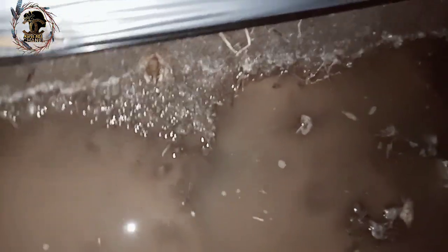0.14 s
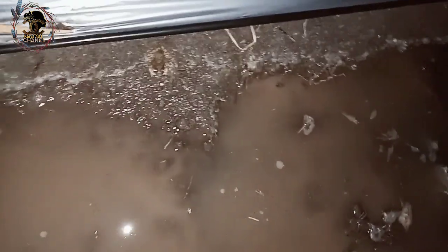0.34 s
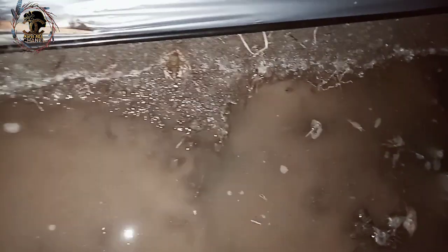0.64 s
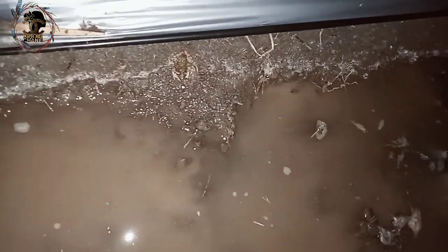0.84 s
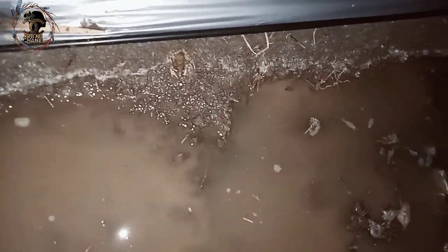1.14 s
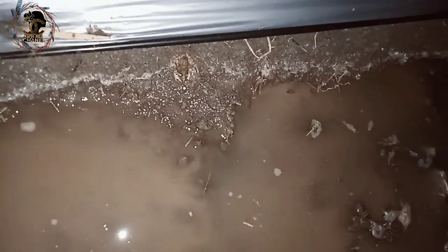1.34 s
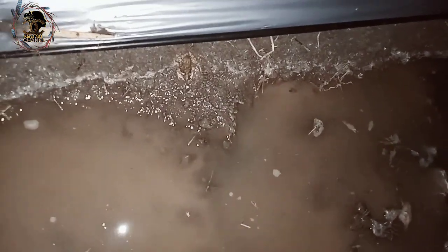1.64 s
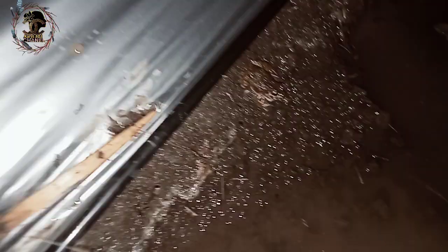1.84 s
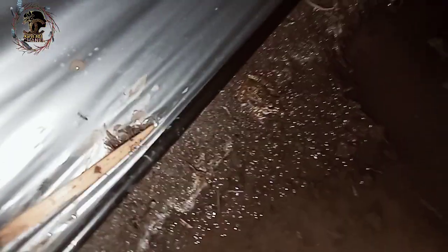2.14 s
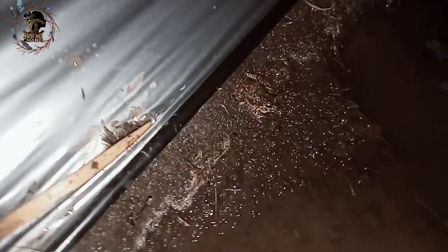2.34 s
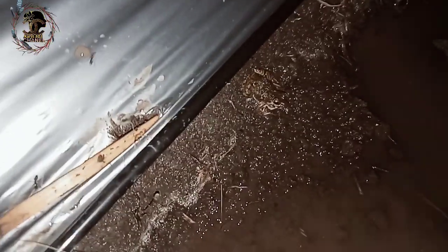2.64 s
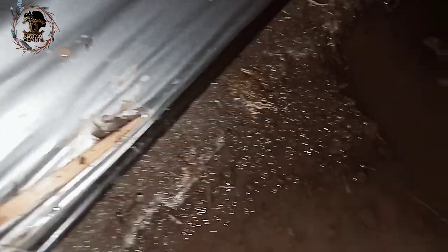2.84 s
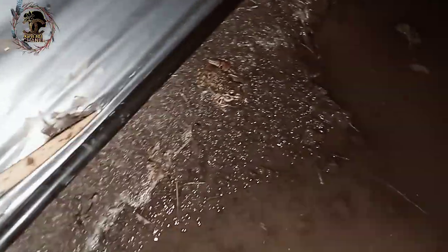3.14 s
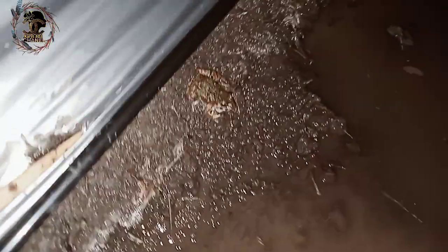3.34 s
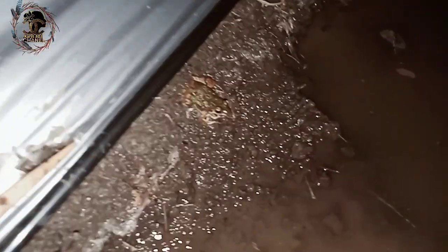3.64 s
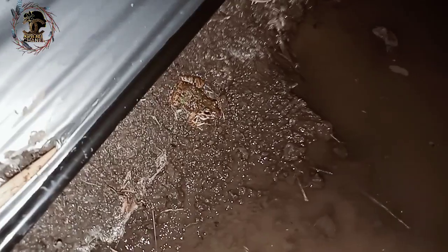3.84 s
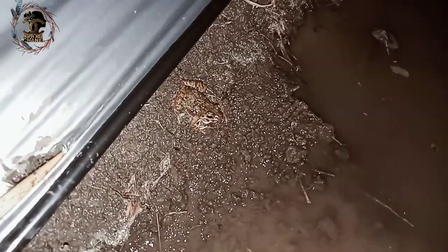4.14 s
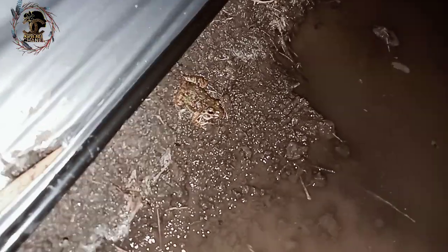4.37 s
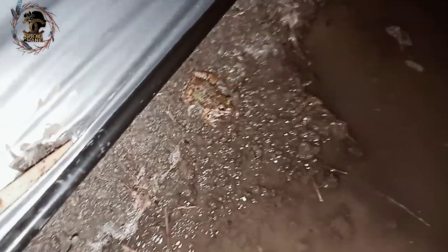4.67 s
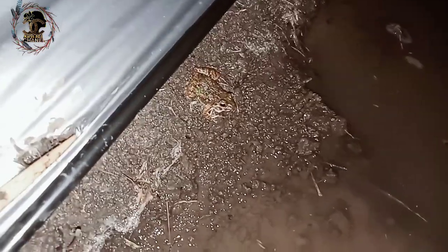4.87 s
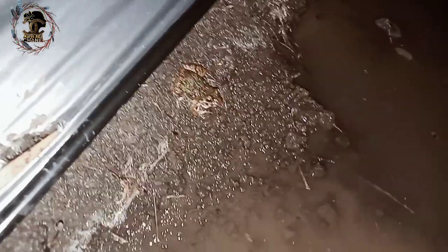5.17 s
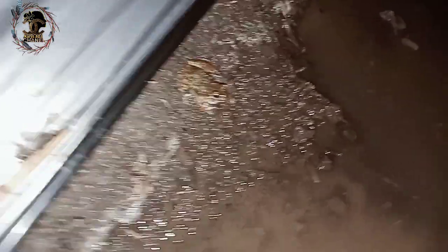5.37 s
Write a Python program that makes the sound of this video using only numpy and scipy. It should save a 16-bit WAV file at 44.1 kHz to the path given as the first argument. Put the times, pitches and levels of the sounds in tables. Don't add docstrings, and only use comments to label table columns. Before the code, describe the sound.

Small frogs give short, rattling, bright croaks at a pond's edge, one close and others farther, over babbling, dripping water.

```python
import sys
import numpy as np
from scipy import signal
from scipy.fft import rfft, irfft, next_fast_len
from scipy.io import wavfile
from scipy.ndimage import map_coordinates

SR = 44100
rng = np.random.default_rng(int(sys.argv[2]) if len(sys.argv) > 2 else 0)


def output_pcm(signal):
    pcm = np.clip(np.atleast_2d(signal).T, -1, 1) * 32767
    wavfile.write(sys.argv[1], SR, np.round(pcm).astype(np.int16))


def how_loud(loudness_db):
    steps = np.asarray(loudness_db, float) / 20
    return 10 ** steps


N = 242991

# f/Hz, level/dB
SAC_BAND = [(1900, -42), (2200, -8), (2330, -16), (2470, -15), (2610, -3), (2745, -7), (2885, 2.5),
            (3020, 2.5), (3155, -12), (3290, 0.5), (3430, -23), (3560, -17.5), (3750, -25.5), (4300, -73)]
# f/Hz, level/dB
THROAT_BAND = [(700, -31.5), (960, -31.5), (1090, -8.5), (1235, 3.5), (1370, -2.5), (1510, -4), (1640, -16),
               (1800, -15.5), (2050, -20), (2300, -51)]
# f/Hz, level/dB
SNAP_BAND = [(3200, -40.5), (3800, -1.5), (4600, -2), (6200, -9), (8300, 2), (10000, -17.5), (15800, -18)]
# f/Hz, delay/s
THROAT_DELAY = [(1000, -.0045), (1165, -.0036), (1300, -.0018), (1440, -.0013), (1600, .0006), (2000, .002)]
SAC_DELAY = [(2130, -.0022), (2260, .001), (2400, .0012), (2540, -.0018), (2680, -.0018), (2815, -.001),
             (2950, .0008), (3090, -.0009), (3220, .0004), (3300, .0024), (3500, .0024)]

# t of first pulse/s, length/cycles, pulse rate/Hz, level/dB
NEAR_LONG_NOTES = [
    (-0.0154, 5.58, 138.6, -17.5),
    (0.4442, 5.67, 139.5, -16),
    (0.8392, 4.79, 138.1, -16.5),
    (1.3474, 5.715, 140.6, -17),
    (1.8052, 6.45, 139.4, -17),
    (2.3501, 6.13, 135.8, -20),
    (3.0581, 6.15, 140.8, -19.5),
    (3.5835, 4.674, 140.2, -18.5),
]
FAR_LONG_NOTES = [(0.1041, 5.59, 134.7, -29), (0.4991, 4.53, 134.4, -28), (1.0142, 4.58, 133.5, -30.5),
                  (1.4724, 5.47, 139.1, -28.5), (2.0102, 5.89, 135.4, -28.5), (2.6777, 4.78, 132.3, -34),
                  (2.7182, 6.33, 139, -32.5), (3.1358, 6.27, 134.2, -32.5), (3.2438, 5.11, 134.7, -30.5),
                  (3.7299, 3.99, 141.8, -28), (4.0753, 4.95, 134.5, -32), (4.5833, 5.3, 135.6, -32.5),
                  (4.8833, 3.87, 135.9, -35), (5.0485, 4.65, 133.3, -31)]
AWAY_LONG_NOTES = [
    (0.6282, 3.86, 139.6, -34.5),
    (0.9611, 6, 137.9, -24),
    (2.2084, 4.24, 139.4, -44.5),
    (3.3905, 2.9, 135.7, -39.5),
    (3.6949, 4.9, 140.6, -31),
    (4.2045, 4.37, 144.6, -40.5),
]
SHORT_CALLS = [(0.2054, 2.9, 122.7, -29), (0.5451, 2.89, 123.3, -18), (0.6083, 1.86, 117.3, -24),
               (0.9492, 1.7, 127.4, -11), (1.1117, 3.03, 125.2, -27.5), (1.4514, 3.12, 117.3, -16),
               (1.5841, 2.88, 132.2, -28), (1.9238, 2.79, 125, -16.5), (2.1597, 1.95, 113.3, -36.5),
               (2.2921, 4.35, 124.4, -33), (2.8452, 2.97, 134.3, -26.5), (3.188, 3, 127.8, -19),
               (4.1842, 2.19, 116.6, -28.5), (5.0104, 2.36, 120.9, -34.5), (5.1601, 2.96, 125, -32)]
AWAY_SHORT_CALLS = [
    (3.3365, 1.46, 93.6, -28),
    (3.3685, 1.99, 132.5, -33.5),
    (3.6763, 1.594, 88.34, -16),
    (3.7155, 0.75, 143, -13.5),
    (3.7813, 2.63, 133.1, -30.5),
    (4.6875, 3.08, 125.1, -30),
]
DEEP_NOTES = [
    (5.2221, 3.63, 125.4, -21.5),
    (5.3503, 1.74, 128.8, -22),
]
WARM_UP_PULSES = [
    (0.832, 0.85, 138, -27),
    (0.9414, 0.82, 128, -25.5),
    (3.5763, 0.345, 138, -26),
    (3.6655, 0.28, 110, -29.5),
    (4.0679, 0.68, 136, -42),
    (5.2141, 0.46, 125, -41),
    (5.3426, 0.7, 129, -40),
]
QUICK_NOTES = [
    (2.1054, 2.6, 149.2, -32.5),
    (2.445, 2.8, 146.5, -22),
    (2.5014, 3.3, 145.4, -27),
]

# t/s, level/dB
FLOW_LEVEL = [(0, -40.5), (0.29, -41.5), (0.69, -40.5), (1.05, -40), (1.3, -40.5), (1.53, -40),
              (1.69, -40.5), (1.96, -40), (2.1, -42), (2.6, -42.5), (3.15, -42), (3.73, -42), (3.96, -43),
              (4.42, -43.5), (4.68, -41.5), (4.9, -41.5), (5.09, -41.5), (5.51, -40)]
# f/Hz, density/(dB per Hz)
BABBLE_BAND = [(120, -50), (200, -25), (360, -14.5), (500, -2.5), (720, -4), (1010, -1.5), (1300, 0),
               (2300, -3.5), (2700, -11.5), (3300, -22), (4500, -45), (5850, -41), (9900, -120)]
FIZZ_BAND = [(2000, -17), (3000, -2), (3900, -7), (5500, -15.5), (7000, -13.5), (9500, -13), (12500, -28.5),
             (15800, -31.5), (16500, -60)]
# t/s, level/dB
FAR_CHORUS_LEVEL = [
    (0, -46),
    (0.2, -68),
    (0.7, -64),
    (1.3, -48.5),
    (2.0, -46.5),
    (2.2, -51),
    (4.1, -58.5),
    (4.45, -45),
    (5.51, -41),
]
# f/Hz, width/Hz, level/dB
PORT_PEAKS = [(3890, 650, 4.5), (4861, 116, 7.5), (8286, 1174, 13.5), (10800, 142, 3), (11430, 470, 11),
              (13500, 720, 13), (15600, 300, 9)]
# f/Hz, density/(dB per Hz)
RUMBLE_BAND = [(15, -54), (25, -27.5), (53, -16.5), (80, -8), (113, 3.5), (145, -4.5), (300, -18),
               (390, -21.5), (660, -120)]
# f/Hz, level/dB
HUM_TONES = [(51, -72.5), (101, -93), (122, -84.5)]

# t/s, level/dB, f/Hz
LOW_PLOPS = [(0.062, -28.5, 1630), (0.205, -31.5, 590), (0.69, -28, 1082), (0.743, -23.5, 1360),
             (0.795, -29, 2400), (0.885, -25, 1690), (1.001, -22.5, 1335), (1.087, -29.5, 923),
             (1.097, -34, 734), (1.138, -25.5, 536.4), (1.438, -31.5, 1360), (1.546, -28.5, 907),
             (1.555, -31.5, 2270), (1.625, -25, 1200), (1.792, -31, 2140), (1.882, -30.5, 1227),
             (1.911, -37.5, 1360), (2.076, -26, 1063), (2.434, -39.5, 352.5), (2.488, -27.5, 3110),
             (2.249, -42.5, 594), (3.999, -30, 855), (4.119, -31.5, 856), (4.278, -40.5, 339),
             (4.476, -28.5, 2000), (4.653, -25, 1555), (4.754, -25.5, 1894), (4.981, -25.5, 2040),
             (5.145, -29, 2010), (5.305, -28.5, 2020)]
HIGH_TICKS = [(0.074, -40.5, 4070), (0.332, -42, 4200), (0.531, -44, 7900), (0.583, -41, 10100),
              (0.615, -42.5, 7530), (0.744, -35, 8070), (1.137, -35.5, 8130), (1.214, -40.5, 7020),
              (1.611, -34.5, 7920), (1.678, -40, 9850), (1.692, -37, 8670), (1.709, -34.5, 7950),
              (2.622, -44, 11100), (2.703, -36.5, 8150), (2.746, -40.5, 7960), (3.159, -44.5, 11200),
              (3.453, -33.5, 8270), (3.734, -38.5, 7650), (4.058, -38, 8070), (4.333, -36.5, 8590),
              (4.361, -42.5, 3820), (2.473, -47.5, 3180), (4.557, -41, 4120), (4.963, -34.5, 8410),
              (5.179, -44.5, 9060), (5.415, -36, 3270)]
# t/s, length/s, level/dB, f/Hz
MUD_BURBLES = [
    (0.81, 0.093, -38.5, 524),
    (0.99, 0.028, -38, 561),
    (1.085, 0.0723, -37, 613),
    (4.72, 0.11, -42.5, 489),
    (5.03, 0.0767, -38.5, 478),
]
# t/s, level/dB
PEAK_CEILING = [
    (0, -11.5),
    (1.98, -11.5),
    (2.0, -14.3),
    (5.51, -14.3),
]

FADE_DB_PER_CYCLE = -14
THROAT_LAG = 0.007
SAC_MIDDLE_HZ, SAC_TILT_HZ, SWELL_S = 2950, 350, .009
SNAP_DB = -26
FIZZ_DB = -11.5
RUMBLE_DB, RUMBLE_GROWS = -66.5, 1.74
STRAY_DB, STRAY_SPREAD_DB, STRAY_LO_HZ, STRAY_HI_HZ = -48, 4, 340, 12000
BURBLE_SPREAD = 0.206


def unit(x):
    return x / np.sqrt(np.mean(x ** 2) + 1e-20)


def curves(rows):
    s, *cols = np.transpose(rows)
    return [np.interp(np.arange(N) / SR, s, c) for c in cols]


def wobble(rate):
    knots = rng.standard_normal(int(N * rate / SR) + 4)
    return map_coordinates(knots, [np.arange(N) * rate / SR])


def along(points, hz):
    f, v = np.transpose(points)
    return np.interp(np.log(hz + 1), np.log(f + 1), v)


def filtered(x, response):
    m = next_fast_len(N + 8192)
    return irfft(rfft(x, m) * response(np.fft.rfftfreq(m, 1 / SR)), m)[..., :N]


def coloured(x, spectrum, peaks=()):
    def response(hz):
        bumps = sum(top / (1 + (2 * (hz - c) / w) ** 2) for c, w, top in peaks)
        return how_loud(along(spectrum, hz) + bumps)
    return unit(filtered(x, response))


def voices(notes, throat_db, onset_db):
    return [(*note, throat_db, onset_db) for note in notes]


def rasp(pulses, db, t60):
    tail = how_loud(-60 * np.arange(400) / SR / t60)
    flutter = signal.fftconvolve(pulses, tail / np.linalg.norm(tail))[:N]
    return pulses + how_loud(db) * flutter * rng.standard_normal(N)


def voiced(pulses, spectrum, sweep, shift, spread):
    def response(hz):
        gain = how_loud(along(spectrum, hz / shift))
        turns = spread * np.cumsum(along(sweep, hz / shift)) * hz[1]
        return gain / np.sqrt(np.mean(gain ** 2)) * np.exp(-2j * np.pi * turns)
    return filtered(pulses, response)


def croak(notes, wake_db, wake, sag_db, gain_db, shift, rasp_db, glide):
    ring, throat, burst, fill = np.zeros((4, N))
    for s, cycles, hz, ring_db, throat_db, onset_db in notes:
        count = int(np.ceil(cycles))
        k = np.arange(count + 1)
        t = k / hz
        chance = rng.standard_normal((count + 1, 3))
        fade = FADE_DB_PER_CYCLE * (count - cycles) * (k >= count - 1)
        edge = gain_db + onset_db * (k == 0) + fade
        unrest = .00002 + .00025 * np.exp(-t / .007)
        at = np.round((s + t + unrest * chance[:, 2]) * SR).astype(int)
        size = np.sqrt(SR / hz) * (at >= 0)
        waking = wake_db * np.exp(-(t / wake) ** 2)
        ring[at] += (k < count) * size * how_loud(ring_db + edge + waking + chance[:, 0])
        fill[at] = glide * (.4 - 1.4 * np.exp(-t / SWELL_S))
        low_db = ring_db + throat_db - 2.5 + edge - 7.7 * (k == count) + sag_db * t
        low = size * how_loud(low_db + chance[:, 1])
        throat[at[1:] + np.round(THROAT_LAG * t[1:] * SR).astype(int)] += low[1:]
        burst[at[0]] += low[0]

    def sac_ring(way):
        pulses = rasp(ring * (1 + way * fill) / 2, rasp_db, t60=.03)
        return voiced(pulses, SAC_BAND, SAC_DELAY, 1, 1)
    slack, taut = sac_ring(-1), sac_ring(1)
    tilted = filtered(taut - slack, lambda hz: np.clip((hz - SAC_MIDDLE_HZ) / SAC_TILT_HZ, -1, 1))
    snap = how_loud(SNAP_DB) * voiced(rasp(ring, 1.89, t60=0.0302), SNAP_BAND, SAC_DELAY, 1, 0)
    start = voiced(burst, THROAT_BAND, THROAT_DELAY, 1.0906 * shift, 0.3413)
    tone = voiced(rasp(throat, rasp_db, t60=0.16), THROAT_BAND, THROAT_DELAY, shift, 0.93)
    return slack + taut + tilted + snap + start + tone


def frogs():
    long = (voices(NEAR_LONG_NOTES, 4.945, -4.5) + voices(FAR_LONG_NOTES, 4.3, -6.0)
            + voices(AWAY_LONG_NOTES, 1.5, 1.18) + voices(WARM_UP_PULSES, 3.6, .1)
            + voices(QUICK_NOTES, -0.6, -2.45))
    short = voices(SHORT_CALLS, -0.77, -1.5) + voices(AWAY_SHORT_CALLS, -3.5, -4.47)
    deep = voices(DEEP_NOTES, 6.28, -1.23)
    return (croak(long, wake_db=-0.5, wake=0.0071, sag_db=-150, gain_db=-2.0,
                  shift=0.9725, rasp_db=-10, glide=0.368)
            + croak(short, wake_db=-0.5, wake=0.0046, sag_db=-150, gain_db=-4.0,
                    shift=1.08, rasp_db=-4.5, glide=0.405)
            + croak(deep, wake_db=1.5, wake=0.0036, sag_db=-120, gain_db=-2.5,
                    shift=0.9377, rasp_db=-3, glide=-0.028))


def place(s, shapes):
    at = np.round(s * SR).astype(int)[:, None] + np.arange(shapes.shape[1])
    inside = (at >= 0) & (at < N)
    return np.bincount(at[inside], shapes[inside], N)


def bubbles(s, hz, gain, cycles, rise, size):
    turn = hz[:, None] * np.arange(size) / SR
    life = turn / cycles[:, None]
    swell = np.exp(-life) * (1 - np.exp(-3 * turn))
    tone = np.sin(2 * np.pi * turn * (1 + rise * np.minimum(life, 3)))
    return place(s, gain[:, None] * swell * tone)


def swarm(count, lo_hz, hi_hz, cycles, spread_db, size):
    u = rng.random((count, 4))
    hz = lo_hz * (hi_hz / lo_hz) ** u[:, 1]
    gain = hz * how_loud(spread_db * u[:, 2] ** 3)
    return bubbles(u[:, 0] * N / SR, hz, gain, cycles * (0.496 + u[:, 3]), 0.0573, size)


def water():
    (flow_db,), (chorus_db,) = curves(FLOW_LEVEL), curves(FAR_CHORUS_LEVEL)
    surge = wobble(14)
    low = swarm(count=5500, lo_hz=255.73, hi_hz=4395, cycles=4.18, spread_db=12.5, size=600)
    high = swarm(count=9000, lo_hz=2936, hi_hz=15970, cycles=7.14, spread_db=13.5, size=250)
    chorus = unit(swarm(count=1500, lo_hz=1626, hi_hz=2270, cycles=4.35, spread_db=4.5, size=500))
    low_wash = coloured(rng.standard_normal(N), BABBLE_BAND)
    high_wash = coloured(rng.standard_normal(N), FIZZ_BAND, PORT_PEAKS)
    babble = coloured(low, BABBLE_BAND) + how_loud(-4.5) * low_wash
    fizz = coloured(high, FIZZ_BAND, PORT_PEAKS) + how_loud(-2.5) * high_wash
    babble *= how_loud(flow_db + 0.6 + 1.1 * surge + 1.4 * wobble(40))
    fizz *= how_loud(flow_db + FIZZ_DB + 1.2 * surge + 1.8 * wobble(45))
    return babble + fizz + chorus * how_loud(chorus_db + 1.7 * wobble(5))


def night():
    t = np.arange(N) / SR
    hum = np.zeros(N)
    for hz, db in HUM_TONES:
        hum += how_loud(db + 2.3 * wobble(2.91)) * np.sin(2 * np.pi * hz * t + .5 * wobble(1.63))
    flow_db, = curves(FLOW_LEVEL)
    rumble_db = RUMBLE_DB + RUMBLE_GROWS * (flow_db - flow_db.mean()) + 1.25 * wobble(5.432)
    return hum + how_loud(rumble_db) * coloured(rng.standard_normal(N), RUMBLE_BAND)


def burbles():
    s, length, db, hz = np.repeat(MUD_BURBLES, 7, axis=0).T
    u = rng.random(size=(len(s), 3))
    pitch_hz = hz * np.exp(BURBLE_SPREAD * (2 * u[:, 1] - 1))
    return np.c_[s + length * u[:, 0], db - 6 * u[:, 2], pitch_hz]


def drops():
    u = rng.random(size=(70, 3))
    stray_db = STRAY_DB + STRAY_SPREAD_DB * (2 * u[:, 1] - 1)
    stray_hz = STRAY_LO_HZ * (STRAY_HI_HZ / STRAY_LO_HZ) ** u[:, 2]
    stray = np.c_[u[:, 0] * N / SR, stray_db, stray_hz]
    s, db, hz = np.vstack([LOW_PLOPS, HIGH_TICKS, stray, burbles()]).T
    cycles = 2.14 * (np.maximum(hz, 1300) / 1000) ** 0.798
    return how_loud(5.5) * bubbles(s - .001, hz, how_loud(db), cycles, 0.0191, size=900)


def echoes(x, t60):
    t = np.arange(SR // 8) / SR
    tail = rng.standard_normal(len(t)) * how_loud(-60 * t / t60) * (t > .003)
    return signal.fftconvolve(x, tail / np.linalg.norm(tail))[:N]


def scene():
    near = frogs() + drops()
    wet = how_loud(-19) * echoes(near, t60=.06)
    return (near + wet + water() + night())[None]


def roll_off(x):
    return signal.sosfilt(signal.butter(12, 16410, fs=SR, output="sos"), x)


def record(dry):
    top = how_loud(curves(PEAK_CEILING)[0])
    x = dry / top
    x = x / (1 + np.abs(x) ** 14) ** (1 / 14)
    x = top * (x + 0.045 * x ** 6)
    mix = filtered(x, lambda hz: (hz < 15830) * hz / np.hypot(hz, 45))
    return roll_off(mix)


dry = scene()
out = record(dry)
output_pcm(out)
```